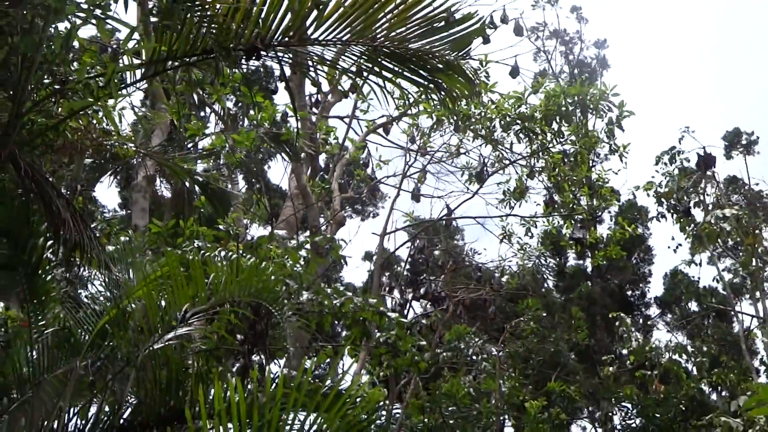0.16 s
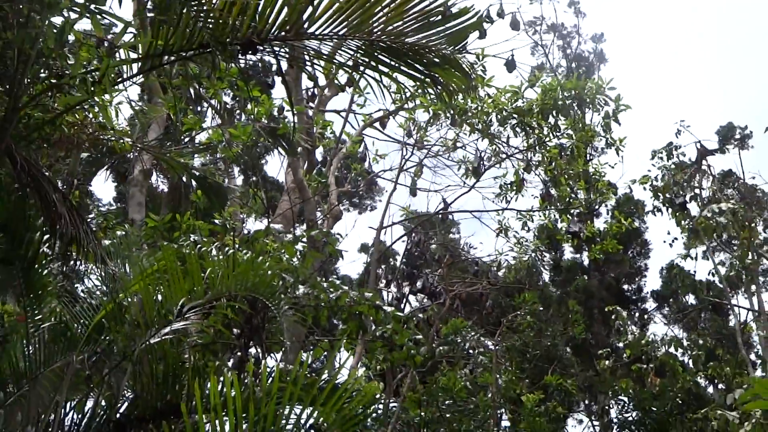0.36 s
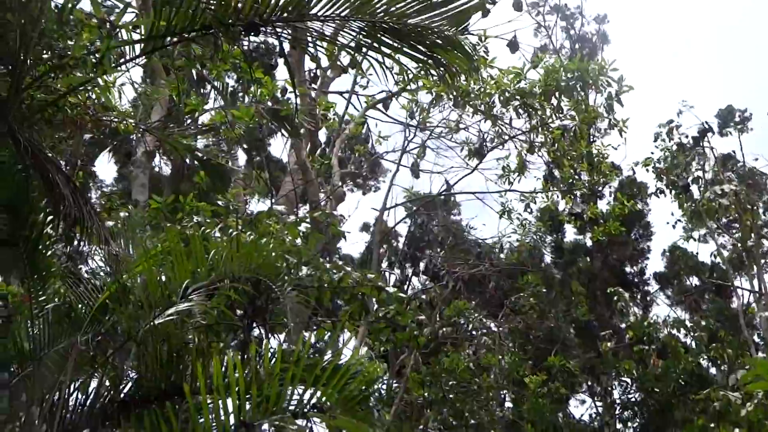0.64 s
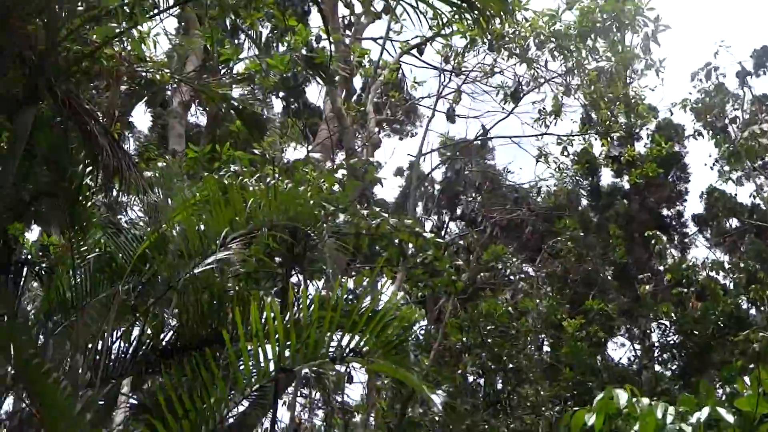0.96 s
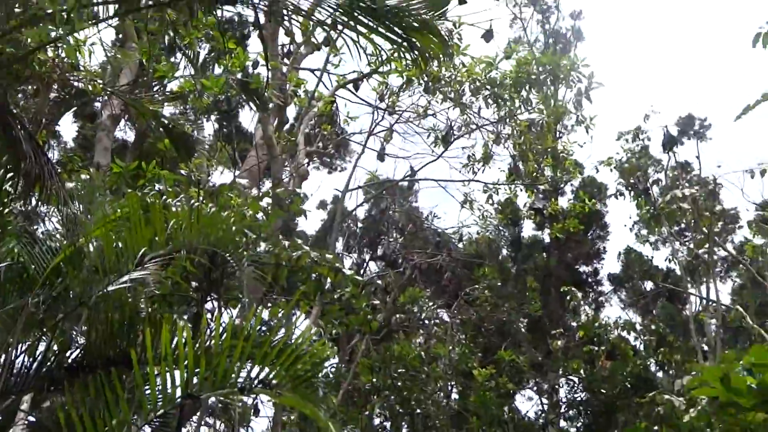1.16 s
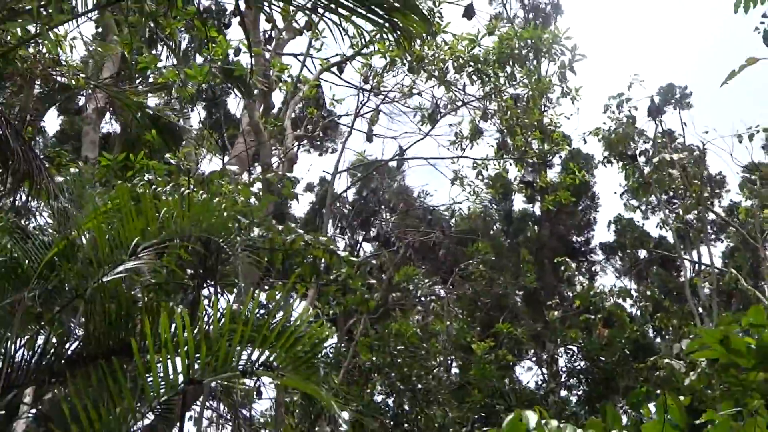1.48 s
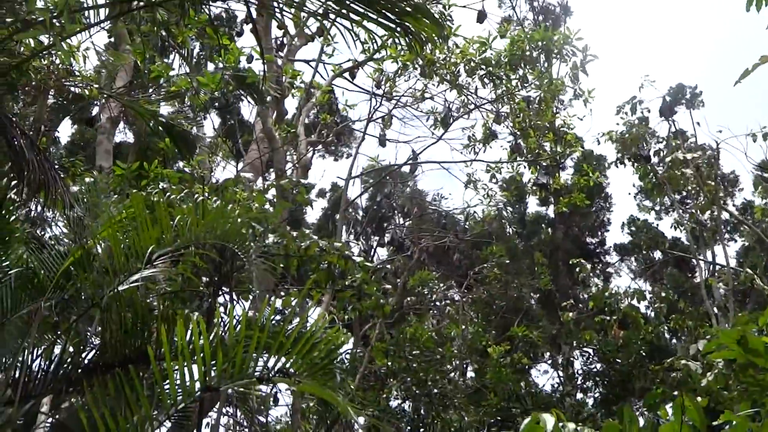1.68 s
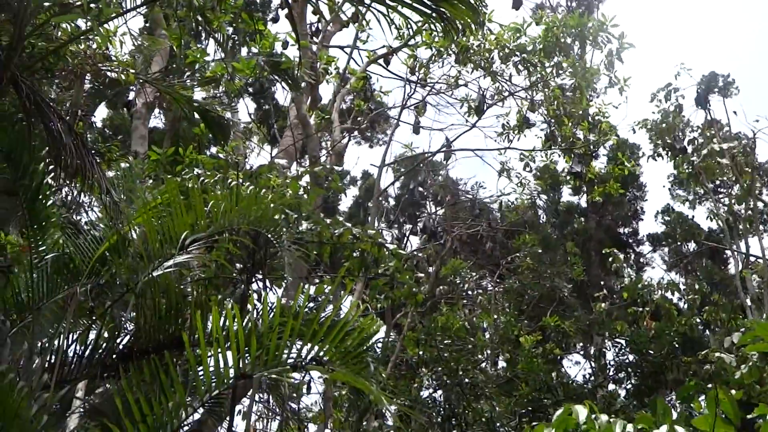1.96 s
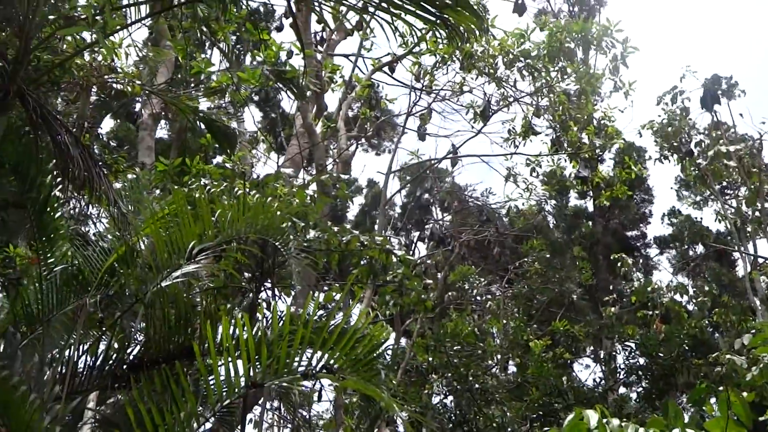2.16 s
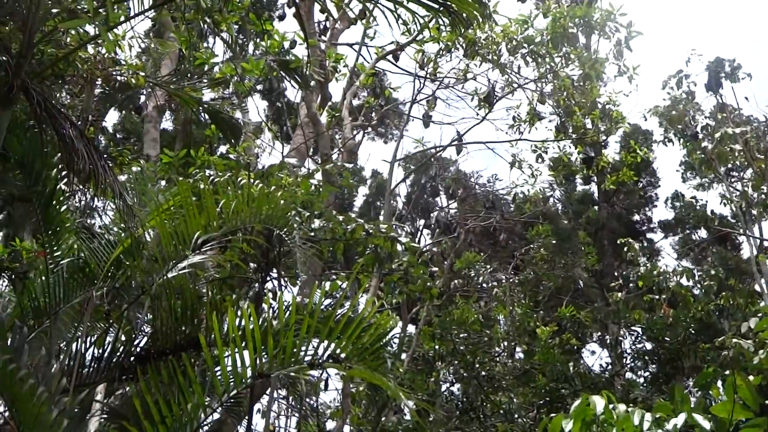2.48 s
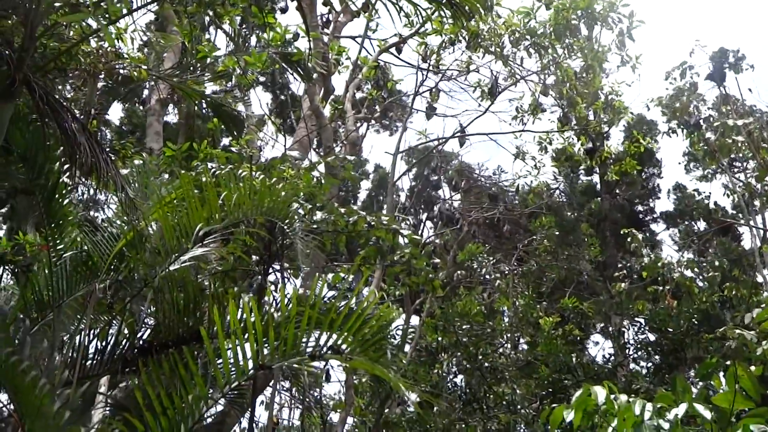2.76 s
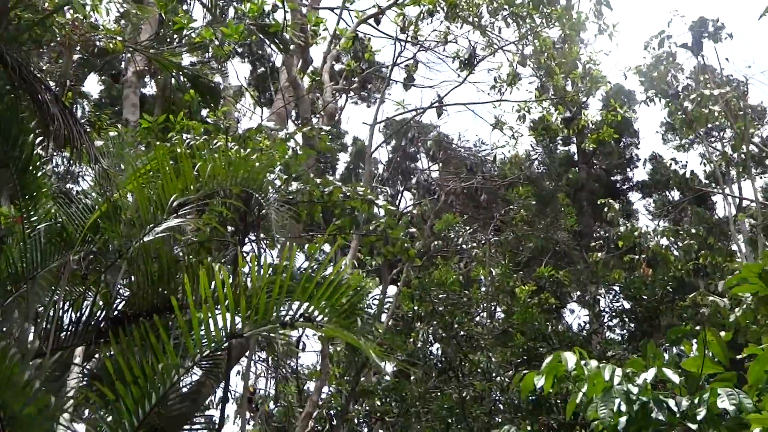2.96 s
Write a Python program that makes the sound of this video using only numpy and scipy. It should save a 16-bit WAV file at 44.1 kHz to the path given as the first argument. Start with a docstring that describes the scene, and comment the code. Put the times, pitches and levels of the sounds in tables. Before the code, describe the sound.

Fruit bats screech and chitter harshly in forest trees over steady cicada buzz

```python
"""Cicadas buzz over the low wash of the forest, both coloured stereo noise; far squeals come and go as fuzzy tones.
Large fruit bats screech in the canopy: first a near one squeals and rasps three times, while others start to
answer from farther trees. Each screech is a stack of blurred overtones over rasping noise. Then one to the right
chitters in short whistled pips, and the farther trees go on answering. The trees echo all the bats."""
import sys
import numpy as np
from scipy import signal
from scipy.fft import rfft, irfft
from scipy.io import wavfile
from scipy.ndimage import uniform_filter1d

SR = 44100
rng = np.random.default_rng(int(sys.argv[2]) if len(sys.argv) > 2 else 0)


def to_wav(sig):
    """Store sig (one row per channel, or 1-D mono) as 16-bit WAV at the path in sys.argv[1].

    Samples outside -1..1 are clipped; the rate is SR.
    """
    pcm = np.clip(np.atleast_2d(sig), -1, 1) * 32767
    pcm = np.round(pcm).astype(np.int16)
    wavfile.write(sys.argv[1], SR, pcm.T)  # frames by channels


N = 138033  # length in samples
EDGE_HZ = 15725  # upper band limit of the whole sound


def gain_of(db):
    """Amplitude factor of a level in dB."""
    return 10 ** (np.asarray(db) / 20)


def evened(x):
    """Scale to rms 1."""
    return x / np.sqrt(np.mean(x ** 2) + 1e-20)


def read(points, hz):
    """Read a curve over frequency, interpolated along log frequency."""
    point_hz, value = np.transpose(points)
    return np.interp(np.log(hz + 1), np.log(point_hz + 1), value)


def along(table):
    """Start sample and every column of a curve table, sample by sample."""
    s, *columns = np.transpose(table)
    n = np.arange(round(max(s[0], 0) * SR), min(round(s[-1] * SR), N))
    return n[0], [np.interp(n / SR, s, column) for column in columns]


def add(mix, at, sound):
    """Lay a sound into the mix from a start sample, cut at the end."""
    part = mix[..., at:at + sound.shape[-1]]
    part += sound[..., :part.shape[-1]]


def wobble(hz):
    """Smooth random drift of rms 1: noise low-passed at hz."""
    return evened(signal.lfilter(*signal.butter(2, 2 * hz / SR), rng.standard_normal(N)))


def sides(left_db):
    """Left and right gains that differ by left_db."""
    return gain_of([[left_db / 2], [-left_db / 2]])


def patches_of(shape, frames, bins):
    """Random patches of rms 1, smoothed over time frames and frequency bins (bins first)."""
    raw = rng.standard_normal(shape[::-1]).T
    return evened(uniform_filter1d(uniform_filter1d(raw, size=bins, axis=0), size=frames, axis=1))


def hiss(colour, patchy_db):
    """Stereo noise of a given colour with drifting patches, as the two microphone ports hear it."""
    # likeness of the ports: pitch_hz, likeness (0 to 1)
    likeness = [(60, 0.99), (180, 1), (550, 0.89), (1650, 0.86), (4970, 0.9), (15000, 1)]
    # phase lag of the right port: pitch_hz, lag_radians
    phase_lag = [(0, 0), (1030, 0.36), (3620, 0.39), (15300, -0.0)]
    # level of left over right: pitch_hz, lean_db
    left_lean = [(60, 0.0), (950, 0.87), (3770, 0.28), (15000, 0.0)]
    frames, hz = N // 256 + 5, np.fft.rfftfreq(1024, 1 / SR)
    a, b, c, d = rng.standard_normal((frames, 513, 4)).T
    patches = patches_of((513, frames), frames=10, bins=10)
    same = np.clip(read(likeness, hz), 0, 1)[:, None]
    left = a + 1j * b
    right = same * left + np.sqrt(1 - same ** 2) * (c + 1j * d)
    port = np.exp(-1j * read(phase_lag, hz)) / gain_of(read(left_lean, hz))
    right = right * port[:, None]
    spectrum = np.array([left, right]) * gain_of(read(colour, hz)[:, None] + patchy_db * patches)
    return evened(signal.istft(spectrum, nperseg=1024, noverlap=768)[1][:, :N])


def forest_wash():
    """The low wash of the forest: steady broadband noise with faint patches."""
    # relative colour of the wash: pitch_hz, level_db (per Hz)
    wash_colour = [(40, -62), (65, -27.5), (130, -15.5), (250, -7), (600, -1.5), (1000, -3.5), (1600, -7.5),
                   (2300, -4), (3500, -11.5), (6000, -12), (10000, -18.5), (15700, -31)]
    return gain_of(-41.5) * hiss(wash_colour, patchy_db=0.72)


def cicada_buzz():
    """Massed cicadas: a band of noise around 7 kHz whose level drifts and flutters."""
    # swell of the chorus: time_s, level_db
    swell = [(0, -47), (.3, -40), (1.7, -43), (3.13, -39.5)]
    # relative colour of the buzz: pitch_hz, level_db (per Hz)
    buzz_colour = [(5500, -33), (6500, -14), (6800, 3), (7300, 2), (7900, -6.5), (8600, -16.5),
                   (10000, -56)]
    level_db = np.interp(np.arange(N) / SR, *np.transpose(swell))
    flutter_db = 0.45 * wobble(hz=200)
    return hiss(buzz_colour, patchy_db=1.0) * gain_of(level_db + flutter_db)


def trees(x):
    """Scattered echoes from trunks and leaves: decaying noise, alike in both ports at the top."""
    t60_s, gap_s, apart_gain, mono_above_hz = 0.39, .004, 0.34, 6950
    t = np.arange(SR // 2) / SR
    common, difference = rng.standard_normal((2, len(t))) * gain_of(-60 * t / t60_s) * (t > gap_s)
    apart = apart_gain * signal.lfilter(*signal.butter(2, 2 * mono_above_hz / SR), difference)
    tail = np.array([common + apart, common - apart]) / np.linalg.norm(common)
    return signal.fftconvolve(x, tail, axes=1)[:, :N]


def fuzzy_line(table, width_hz, left_db):
    """A smeared squeal: a gliding tone multiplied by narrow-band noise."""
    # the narrower the line, the stronger the firm tone inside its fuzz
    firm_hz = 88  # width at which the firm tone has a gain of 1
    at, (hz, level_db) = along(table)
    r = np.exp(-np.pi * width_hz / SR)
    complex_noise = [1, 1j] @ rng.standard_normal((2, N))
    smear = signal.lfilter([1], [1, -2 * r, r * r], complex_noise)[:len(hz)]
    smear = smear / np.std(smear) + (firm_hz / width_hz) ** 2
    line = (smear * np.exp(2j * np.pi * np.cumsum(hz) / SR)).real
    fade = signal.windows.tukey(len(hz), .1)
    return at, evened(line) * gain_of(level_db) * fade * sides(left_db)


def fuzzy_lines():
    """Far squeals smeared by foliage, the near bat's lingering 4.3 kHz tail and one falling chitter pip."""
    # one curve per line: time_s, pitch_hz, level_db
    # (the one at .562 s is the tail of the near bat's second cry, the one at 2.2 s the short pip)
    line_curves = [
        [(0, 2430, -66), (.03, 2300, -48), (.06, 2290, -35), (.085, 2230, -71)],
        [(.2, 1938, -46), (.308, 2080, -51), (.318, 2142, -40.5), (.344, 2159, -38.5), (.4, 2115, -45),
         (.46, 2046, -47), (.66, 2107, -57)],
        [(.562, 4290, -47), (.63, 4140, -54)],
        [(1.24, 2141, -57), (1.33, 2130, -47.5), (1.405, 2064, -44), (1.44, 2210, -42.5), (1.55, 2212, -39),
         (1.66, 2245, -39.5), (1.8, 2486, -58)],
        [(1.86, 2300, -51), (1.9, 2347, -41.5), (1.99, 2351, -50.5), (2.2, 2393, -42.5), (2.37, 2293, -43.5),
         (2.55, 2172, -46.5), (2.78, 2124, -56)],
        [(2.2, 2033, -34), (2.23, 1883, -52)],
        [(2.81, 2018, -48), (2.84, 2050, -40.5), (2.865, 2100, -51), (2.895, 2200, -41), (2.93, 2100, -46),
         (2.955, 2154, -45.5), (3.012, 2146, -40.5), (3.13, 2020, -49)],
    ]
    # fuzz of each line: width_hz
    line_widths = [150, 60, 90, 232, 332, 80, 279]
    # level of left over right for each line: left_db
    line_sides = [0, 1.2, 2, 0.7, -1.5, 1, 1]
    mix = np.zeros((2, N))
    for row in zip(line_curves, line_widths, line_sides):
        add(mix, *fuzzy_line(*row))
    return mix


def pip(start_s, peak_db, hz, length_s):
    """A short whistle that swells, sags in pitch and dies."""
    sag = 0.03  # share of the pitch lost from start to end
    u = np.arange(0, 1, 1 / (max(length_s, .003) * SR))  # progress through the pip
    tone = np.sin(2 * np.pi * np.cumsum(hz * (1 + sag * (.5 - u))) / SR)
    swell = np.sin(np.pi * u ** 0.63) ** 1.65
    return round((start_s - .002) * SR), gain_of(peak_db) * tone * swell * sides(left_db=-4.5)


def chitter():
    """A bat to the right chittering in bursts of short pips."""
    # one row per pip, each sounding 2 ms ahead of its time: time_s, peak_db, pitch_hz, length_s
    pip_rows = [(1.226, -39, 2580, 0.021), (1.464, -29.5, 2704, 0.018), (1.485, -28, 2490, 0.011),
                (1.582, -33.5, 2050, 0.014), (1.5974, -29, 2510, 0.011), (1.6045, -22.5, 2454, 0.019),
                (1.619, -23.5, 2470, 0.022), (1.638, -33, 2260, 0.016), (1.681, -24.5, 2477, 0.014),
                (2.061, -31, 2660, 0.015), (2.0767, -26.5, 2460, 0.012), (2.09, -26, 2510, 0.01),
                (2.104, -23.5, 2443, 0.015), (2.1318, -27.5, 2420, 0.011), (2.147, -23.5, 2403, 0.017),
                (2.1657, -24.5, 2416, 0.011), (2.178, -28, 2370, 0.0066), (2.185, -36, 2530, 0.01),
                (2.202, -26, 2314, 0.026), (2.261, -30, 2337, 0.031), (2.333, -31, 2240, 0.01),
                (2.344, -25.5, 2480, 0.0087)]
    mix = np.zeros((2, N))
    for row in pip_rows:
        add(mix, *pip(*row))
    return mix


def rasp_noise(n, throb, colour):
    """Torn airflow: coloured noise that throbs with the voice and breaks into brief bright patches."""
    throb_db, torn_db = 1.5, 3.5
    noise = rng.standard_normal(n) * gain_of(throb_db * throb)
    spectrum = signal.stft(noise, nperseg=256)[2]
    torn = patches_of(spectrum.shape, frames=5, bins=2)
    noise = signal.istft(spectrum * gain_of(torn_db * torn), nperseg=256)[1][:n]
    tint = gain_of(read(colour, np.fft.rfftfreq(n, 1 / SR)))
    return evened(irfft(rfft(noise) * tint, n))


def screech(table, rasp_colour, dull_db):
    """Overtones that shake and break into sidebands as the blur grows, over the rasp of torn airflow."""
    # voice colour: pitch_hz, level_db
    voice_colour = [(2500, 1), (4500, -2.5), (6000, -2.5), (9300, -3), (11000, -13), (14000, -3),
                    (16000, -36)]
    rough_dull_db = -3.5  # per 100 Hz of blur, growing with the square of the overtone
    # in a clean near squeal the overtones hold near a level while the lowest tone swells
    steady, steady_db, clean_hz = 1.1, -37, 100  # strength, held level, blur that ends the hold
    # share of the blur that shakes the pitch; sideband depth per 100 Hz of blur; sideband reach
    shake_share, skirt_depth, skirt_hz = .28, .75, 270
    at, (hz, voice_db, blur, rasp_db) = along(table)
    n, turns = len(hz), np.cumsum(hz) / SR
    throb = wobble(skirt_hz)[:n]
    skirt = skirt_depth * blur / 100
    clean = np.clip(1 - blur / clean_hz, 0, 1)
    held_db = steady * clean * np.clip(steady_db - voice_db, -13, 13)
    voice = 0
    for k in range(1, 6):
        shake = np.cumsum(shake_share * blur * wobble(hz=151)[:n]) / SR
        sidebands = 1 + skirt * (throb + 1j * wobble(skirt_hz)[:n])
        sidebands = sidebands / np.sqrt(1 + 2 * skirt ** 2)  # keep the power even
        db = read(voice_colour, k * hz) + dull_db * (k - 1)
        db = db + rough_dull_db * blur / 100 * (k - 1) ** 2
        if k > 1 and dull_db == 0:  # near overtones only
            db = db + held_db
        tone = (sidebands * np.exp(2j * np.pi * (k * turns + shake))).imag
        voice = voice + gain_of(db) * (k * hz < EDGE_HZ) * tone
    rasp = rasp_noise(n, throb, rasp_colour)
    return at, np.sqrt(2) * gain_of(voice_db) * voice + gain_of(rasp_db) * rasp


def far_screeches():
    """Answers from farther trees, each overtone dulled further by the distance."""
    # one curve per screech: time_s, pitch_hz, voice_db, blur_hz, rasp_db
    far_curves = [
        [(.37, 2330, -68, 40, -47), (.405, 2500, -47, 24, -34.5), (.428, 2565, -47, 28, -38),
         (.433, 3400, -46, 30, -42), (.455, 2510, -40.5, 82, -43.5), (.51, 2480, -65, 230, -57)],
        [(1.12, 5390, -58, 302.4, -46), (1.17, 5350, -42, 305, -39), (1.24, 5200, -43, 199, -35.5),
         (1.34, 5100, -37, 129, -36.5), (1.4, 5150, -38, 99, -36), (1.53, 5250, -38, 100, -40),
         (1.63, 5370, -49, 251.5, -41), (1.79, 5380, -53, 250, -61)],
        [(1.99, 3290, -58, 80, -65), (2.0, 3520, -46, 81, -45), (2.025, 3710, -41, 170, -37.5),
         (2.06, 3000, -48, 250, -43), (2.15, 2610, -54, 298, -46.5), (2.23, 2470, -63, 300, -45.5)],
        [(2.23, 2750, -57, 149, -65), (2.26, 2767, -45.5, 100, -47), (2.345, 2880, -47, 60, -43.5),
         (2.39, 2740, -54, 151, -49.5), (2.6, 2624, -50, 200, -51)],
        [(2.8, 5100, -65, 200, -56), (2.89, 5020, -56, 101, -44.5), (2.91, 5130, -38, 80, -41),
         (2.935, 5230, -61, 200, -60), (2.96, 5150, -46, 296, -42.5), (3.13, 5080, -43, 300, -44)],
    ]
    # relative colour of the far rasp: pitch_hz, level_db (per Hz)
    far_rasp = [(880, -67), (1500, -10.5), (1820, -14), (2110, -8), (2330, -4.5), (3410, -13), (5200, -2),
                (5960, -1.5), (9450, -7.5), (15600, -25.5)]
    mix = np.zeros((2, N))
    for table in far_curves:
        add(mix, *screech(table, far_rasp, dull_db=-9.5))
    return mix


def near_screeches():
    """The near bat squealing and rasping three times, its overtones undulled by distance."""
    # one curve per screech: time_s, pitch_hz, voice_db, blur_hz, rasp_db
    near_curves = [
        [(.082, 3350, -62, 80, -70), (.09, 3450, -44, 80, -45), (.109, 3830, -39, 110, -37),
         (.111, 5700, -43, 140, -32.5), (.128, 5880, -41, 140, -36.5), (.157, 5350, -33.5, 100, -49),
         (.159, 4730, -51, 50, -38), (.172, 4580, -42, 45, -39), (.19, 4805, -46, 25, -42),
         (.21, 4670, -35.5, 35, -41), (.24, 4510, -28.5, 40, -39), (.254, 4150, -37, 70, -42),
         (.266, 3156, -42, 270, -32.5), (.286, 2947, -31.5, 300, -34), (.297, 2850, -49, 150, -43),
         (.345, 2780, -49, 80, -41)],
        [(.528, 4890, -58, 40, -68), (.54, 5250, -32.5, 43, -51), (.549, 5195, -35, 20, -36),
         (.555, 4380, -43, 10, -42), (.57, 4240, -42, 20, -51), (.572, 5185, -48, 94, -38),
         (.6, 5360, -38, 24, -37), (.617, 5225, -50, 31, -35), (.619, 3080, -56, 170, -41.5),
         (.665, 2788, -35, 140, -34), (.68, 2848, -45, 180, -34.5), (.698, 2800, -33, 180, -36),
         (.712, 2850, -54, 150, -52), (.79, 2510, -42.5, 163, -48)],
        [(.806, 3263, -45, 39.8, -60), (.82, 3375, -42, 40, -36.5), (.84, 3020, -37.5, 102.2, -34.5),
         (.9, 2978, -32.5, 150, -35), (.96, 2913, -43, 145, -35), (.99, 3060, -36, 149, -34.5),
         (1.045, 2877, -37.5, 129, -34), (1.097, 2846, -41.5, 177, -34.5), (1.104, 2800, -48, 200, -45),
         (1.16, 2780, -58, 201.2, -42)],
    ]
    # relative colour of the near rasp: pitch_hz, level_db (per Hz)
    near_rasp = [(880, -58), (1500, -25), (2030, -15), (2890, -14), (4810, -11), (5790, -2.5), (6330, -5),
                 (10300, -6.5), (12900, -10), (15600, -26)]
    mix = np.zeros((2, N))
    for table in near_curves:
        add(mix, *screech(table, near_rasp, dull_db=0))
    return mix


def scene():
    """Bats and their echoes over the cicadas and the forest wash."""
    background = forest_wash() + cicada_buzz()
    far_and_fuzzy = fuzzy_lines() + far_screeches()
    pips = chitter()
    near = near_screeches()
    echoes = trees(gain_of(-4.5) * near + gain_of(-4) * far_and_fuzzy + gain_of(-9) * pips)
    return near + far_and_fuzzy + pips + echoes + background


def record(dry):
    """Upper band limit: a steep low-pass that keeps the timing of all pitches."""
    low_pass = signal.firwin(2047, EDGE_HZ, window=("kaiser", 9), fs=SR)
    return signal.oaconvolve(dry, low_pass[None], "same")


dry = scene()
out = record(dry)
to_wav(out)
```